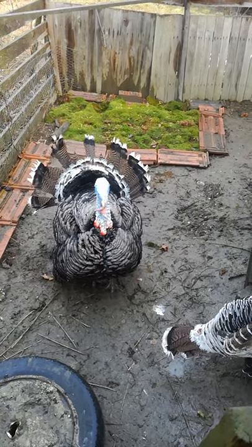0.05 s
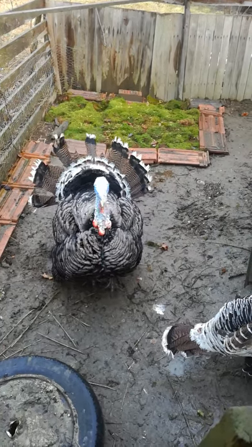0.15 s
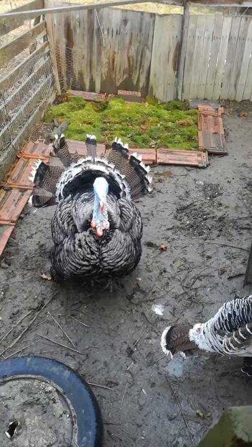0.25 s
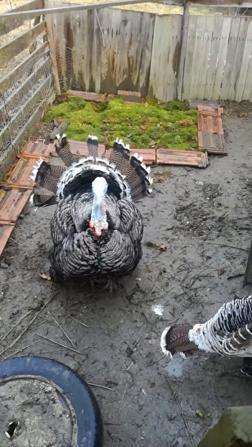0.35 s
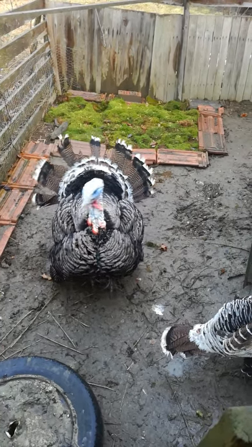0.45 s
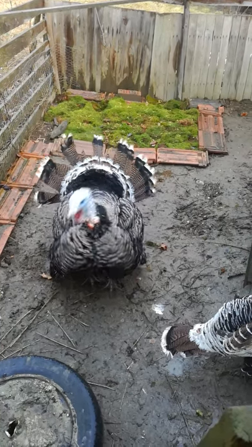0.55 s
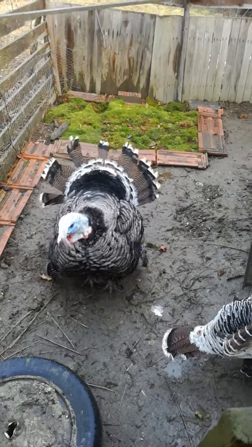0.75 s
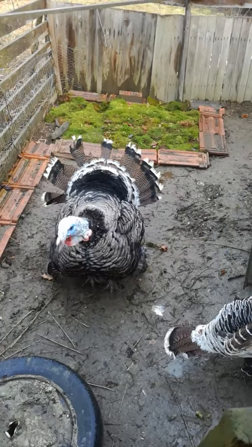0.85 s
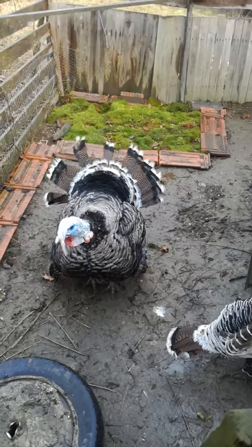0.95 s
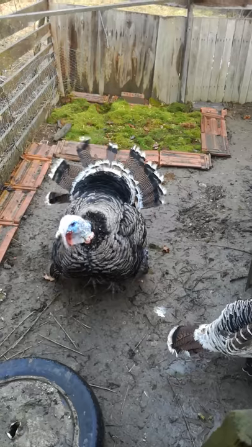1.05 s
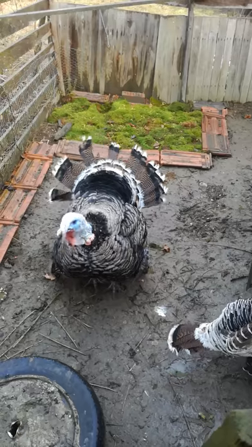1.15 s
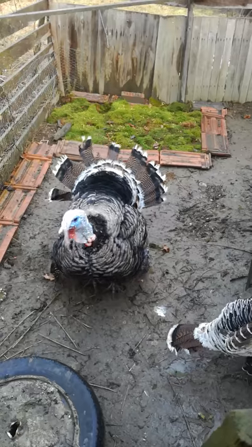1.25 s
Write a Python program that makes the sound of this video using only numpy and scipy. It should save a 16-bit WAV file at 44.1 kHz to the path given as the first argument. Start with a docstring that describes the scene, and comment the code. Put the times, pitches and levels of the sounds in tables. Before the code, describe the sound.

Loud, raspy turkey gobble tumbling between low and high notes, just after a short hoarse bird yelp

```python
"""A faint low hum and outdoor rumble, made of a wavering sine and coloured noise, lie under the whole scene.
Another bird's yelp comes first, hoarse and then clear: harmonics and rasp follow one drawn pitch and level line.
It sets off a turkey tom in a small, wood-fenced farm pen. His gobble is a run of quick raspy notes flipping
between a low and a high register, weaker towards the end, with soft deep thumps under the first and last notes.
Both birds pass through brief echoes of ground and fences, ringing resonances and short and long noise tails."""
import sys
import numpy as np
from scipy import signal
from scipy.fft import rfft, irfft, next_fast_len
from scipy.io import wavfile
from scipy.ndimage import uniform_filter1d, minimum_filter1d, map_coordinates

SR = 44100
rng = np.random.default_rng(int(sys.argv[2]) if len(sys.argv) > 2 else 0)


def file_out(sig):
    """Save sig as 16-bit WAV at sys.argv[1]."""
    # one column per channel
    cols = np.atleast_2d(sig).T
    # limit, then scale
    lim = np.clip(cols, -1, 1)
    pcm = np.round(lim * 32767).astype(np.int16)
    wavfile.write(sys.argv[1], SR, pcm)


N = 57330  # length in samples


def undb(db):
    """Turn decibels into an amplitude factor."""
    return 10 ** (np.asarray(db) / 20)


def unit(x):
    """Scale to rms 1."""
    return x / np.sqrt(np.mean(x ** 2) + 1e-18)


def colour(x, points, share=1, phase=((0, 0), (1, 0))):
    """Filter by a share of a (Hz, dB) curve and an optional (Hz, radians) curve."""
    n = x.shape[-1]
    size = next_fast_len(n + 2048)
    f = np.arange(size // 2 + 1) * SR / size
    hz, db = np.array(points).T
    gain = undb(share * np.interp(np.log(f + 1), np.log(hz), db))
    turn = np.exp(1j * np.interp(f, *np.array(phase).T))
    return irfft(rfft(x, size) * gain * turn, size)[..., :n]


def wander(n, rate):
    """Smooth random motion with a spread near 1, drawn from `rate` random points a second."""
    at = np.arange(n) / SR * rate
    return map_coordinates(rng.standard_normal(4096), [at], order=3, mode="wrap")


def swell(n):
    """Rise and fall of one note: a sine arch, narrowed by its exponent."""
    return np.sin(np.pi * (np.arange(n) + .5) / n) ** 1.44


def add(out, start, x):
    """Mix a sound in at its time in seconds."""
    i = int(start * SR)
    out[i:i + len(x)] += x[:N - i]


def air():
    """Quiet outdoor rumble, partly shared by both channels, with a faint wavering hum."""
    rumble_db, hum_hz, hum_db = -71, 80, -70.5
    # Colour of the rumble. Each row: frequency in Hz, level in dB.
    rumble_colour = [(25, -9), (40, 0), (55, -12.5), (82, -6), (110, -9), (170, -6.5), (300, -16),
                     (1000, -30), (3000, -40.5), (8000, -42), (15000, -42)]
    noise = rng.standard_normal((3, N))
    rumble = colour(noise[:2] + noise[2], rumble_colour)
    hum = np.sin(2 * np.pi * np.cumsum(hum_hz * (1 + 0.013 * wander(N, 15))) / SR)
    return undb(rumble_db) * unit(rumble) + undb(hum_db) * unit(hum)


def voice(hz, levels, flutter, blur, throat, rasp):
    """A fluttering syrinx: fundamental, octave, uneven upper harmonics, a puff of rasp each cycle, a hissing sheen."""
    flutter_hz, overtone_spread_db, puff_db, hiss_noise_db = 418, 4, 1.2, -3
    # Colour of the hissing sheen. Each row: frequency in Hz, level in dB.
    hiss = [(2000, -4), (4200, -13.5), (6000, 0), (8000, -5), (10000, -5), (12000, -17.5), (15000, -11)]
    n = len(hz)
    hz = hz * (1 + flutter * wander(n, flutter_hz))
    phase = 2 * np.pi * np.cumsum(hz) / SR
    upper = 0
    for k in np.arange(3, 25):
        below_nyquist = k * hz < SR / 2
        size = undb(overtone_spread_db * wander(n, 45)) * below_nyquist
        blurred = phase + blur * wander(n, 350)  # blur in radians, multiplied by the harmonic number
        upper = upper + size * np.cos(k * blurred + rng.uniform(0, 2 * np.pi))
    puffs = rng.standard_normal(n) * (1 + .5 * np.cos(phase))
    puffs = puffs * undb(puff_db * wander(n, 200))
    sheen = colour(unit(upper) + undb(hiss_noise_db) * unit(puffs), hiss)
    parts = [np.cos(phase), np.cos(2 * phase), colour(upper, throat), colour(puffs, rasp), sheen]
    # a list of four levels leaves the sheen out
    return sum(undb(db) * unit(part) for db, part in zip(levels, parts))


def yelp():
    """A hoarse start breaks upward into a clear held note, as pitch and levels glide from point to point."""
    # Course of the yelp. Each row: time in seconds, pitch in Hz, then the levels, before the pen, of the
    # fundamental, octave, upper harmonics and rasp in dB.
    course = [(0, 923, -63, -53.5, -64.5, -56.5), (0.038, 945.4, -81, -67, -69, -72.5),
              (0.088, 906.2, -77, -69, -77, -65), (.102, 766.4, -61.5, -63, -59.5, -44),
              (0.126, 746, -56, -52, -48.5, -41), (.168, 759, -44.5, -37.5, -44, -45.5),
              (.174, 939.5, -53.5, -46, -44, -34), (.195, 951, -45.5, -38.5, -43, -48),
              (.218, 951.5, -53.5, -23.5, -38, -53.5), (.255, 962, -44.5, -23.5, -38.5, -51.5),
              (0.283, 959, -42.5, -22.5, -37, -61.5), (0.302, 931, -48.5, -33, -49.5, -62.5),
              (0.316, 922.6, -49.5, -27, -34, -46), (.323, 891.5, -52.5, -44.5, -48, -41.5),
              (0.326, 782, -41.5, -53, -57, -42), (.345, 747, -52.5, -55, -56.5, -43),
              (.36, 733, -53.5, -44.5, -65.5, -58), (.39, 710, -92, -93.5, -94, -96.5)]
    # Colour of the upper harmonics. Each row: frequency in Hz, level in dB.
    throat = [(2200, 10), (2900, 1), (3800, 1.5), (4700, -20.5), (5400, -23.5), (6700, -7.5), (7700, -6),
              (10000, -30.5), (14500, -28.5)]
    # Colour of the rasp. Each row: frequency in Hz, level in dB.
    rasp = [(300, -40.5), (550, -51.5), (750, -1.5), (1150, -16.5), (1800, 8), (3000, -6), (4600, -11),
            (5400, -38), (7600, -20), (10000, -35.5), (15000, -50.5)]
    t = np.arange(N) / SR
    times, *columns = np.array(course).T
    hz, *levels = (np.interp(t, times, column) for column in columns)
    sounding = t < times[-1]
    return voice(hz, levels, flutter=.002, blur=.02, throat=throat, rasp=rasp) * sounding


def gobble():
    """Overlapping notes, each a short curve of pitch in one of two registers; they dull as the gobble runs out."""
    shimmer_db, dullest_s = 2.21, 1.08
    # Notes of the gobble. Each row: start in seconds, length in seconds, first, middle and last pitch in Hz,
    # then the levels, before dulling, swell and pen, of the fundamental, octave, upper harmonics, rasp and hiss in dB.
    notes = [ (.353, 0.016, 557, 622.5, 676, -31, -23.5, -32, -35, -49),
             (0.361, 0.032, 643.6, 692.4, 661.7, -18.5, -6.5, -9.5, -22, -30.5),
             (0.389, 0.022, 636, 578, 565, -41.5, -15.5, -19, -34, -51.5),
             (.411, 0.022, 611, 691, 725, -18, -4, -30, -33, -53),
             (0.415, 0.027, 750, 787.6, 700, -12, -29, -37.5, -23.5, -38),
             (0.426, 0.053, 1106, 1102, 1047, -15.5, -31.5, -33, -37.5, -30),
             (0.46, 0.05, 704, 634, 560, -37, -54, -44, -35, -58),
             (0.505, .050, 1097, 1038, 1017, -25.5, -35.5, -30, -34.5, -37.5),
             (.534, 0.026, 746, 718, 686, -32.5, -33.5, -35.5, -41.5, -47),
             (0.572, 0.047, 1105, 1048, 993, -15.5, -23.5, -32, -29, -38.5),
             (0.59, 0.084, 730.6, 739.6, 780.4, -24.5, -31.5, -29, -41.5, -48.5),
             (0.637, 0.059, 752.7, 781.8, 604, -22, -34, -19.5, -29.5, -40),
             (.693, 0.044, 1077, 1068, 1008, -12.5, -42.5, -26.5, -34, -43.5),
             (0.725, 0.024, 734, 655, 663, -34.5, -34, -36, -32.5, -67),
             (0.741, 0.034, 1016, 986.5, 1002, -48, -31.5, -33, -42, -69),
             (0.749, 0.067, 1044, 1039, 1010, -12.5, -42.5, -38, -27.5, -42),
             (0.8, .036, 766, 735.2, 645, -23.5, -38.5, -30.5, -31.5, -45),
             (0.837, .052, 578, 671, 668.6, -24.5, -29.5, -37.5, -37.5, -57),
             (0.869, 0.036, 860.4, 852.4, 820, -43, -24.5, -36, -28, -80),
             (0.897, 0.023, 1034, 982, 941, -16.5, -44, -42, -31, -64.5),
             (0.902, 0.02, 875.5, 853, 855, -38.5, -32, -51, -33.5, -71.5),
             (.906, 0.028, 676, 557, 489, -36, -40, -77, -40, -112),
             (0.965, .020, 974, 925, 924, -30.5, -57, -63.5, -52, -70.5),
             (0.973, .046, 605.7, 673.8, 640.7, -32.5, -31, -39.5, -38.5, -54),
             (1.001, 0.036, 633, 588, 472, -35.5, -44.5, -65, -44, -86),
             (1.037, .026, 1063, 847, 800, -53, -42, -53, -51, -75.5),
             (1.052, .020, 952, 933, 903, -21.5, -46, -46, -37, -82),
             (1.061, 0.031, 937, 880, 918, -33, -75, -60, -38.5, -86)]
    # Throat and beak: colour of the upper harmonics. Each row: frequency in Hz, level in dB.
    throat = [(1600, 27.5), (2100, 10.5), (2900, 5), (3650, -8.5), (4200, 4), (4600, -12.5), (5400, -2.5),
              (7500, -37.5), (10000, -26), (15000, -47.5)]
    # Colour of the rasp. Each row: frequency in Hz, level in dB.
    rasp = [(100, -46), (300, -27), (410, -29), (510, -3), (1100, -2), (1900, -1), (2500, -11), (3400, -12),
            (4500, -21), (6000, -25), (9000, -36), (15000, -50)]
    # Dulling that would be complete at dullest_s. Each row: frequency in Hz, level change in dB.
    dulling = [(3500, 0.5), (7000, -3), (12000, -13)]
    out = np.zeros(N)
    first_start = notes[0][0]
    for start, length, first, middle, last, *levels in notes:
        n = int(length * SR)
        arch = np.polyfit([0, .5, 1], [first, middle, last], 2)
        hz = np.polyval(arch, np.linspace(0, 1, n))
        note = voice(hz, levels, flutter=.007, blur=.03, throat=throat, rasp=rasp)
        spent = ((start - first_start) / (dullest_s - first_start)) ** 2
        note = colour(note, dulling, spent)
        add(out, start, note * swell(n) * undb(shimmer_db * wander(n, 250)))
    return out


def thumps():
    """A few soft, deep sine cycles under the first and last notes."""
    thump_hz = 67.7
    # Thumps. Each row: start in seconds, length in seconds, level before the swell in dB.
    hits = [(0.359, 0.086, -44), (0.975, 0.068, -52.5)]
    out = np.zeros(N)
    for start, length, db in hits:
        n = int(length * SR)
        tone = np.sin(2 * np.pi * thump_hz * np.arange(n) / SR)
        add(out, start, undb(db) * swell(n) * unit(tone))
    return out


def place(x, balance, phase):
    """Direct sound, echoes, resonances and noise tails in one response, then a stereo tilt by frequency."""
    pen_t60_s, pen_db, far_t60_s, far_db = 0.12, -8.5, 1.0, -45  # far level before its colour
    # Colour of the long, far tail. Each row: frequency in Hz, level in dB.
    far_colour = [(200, -3), (1000, -3), (2000, 6.5), (5000, -9.5), (12000, -30)]
    # Echoes from ground and fences. Each row: left delay in seconds, right delay in seconds, level in dB.
    echoes = [(.0031, 0.0056, -13), (.0092, 0.0058, -17), (0.0192, .0168, -26)]
    # Narrow resonances that ring on after each note. Each row: frequency in Hz, time to fall 60 dB in
    # seconds, gain at the resonance in dB.
    rings = [(497, 0.069, 2), (1736, .16, -11), (2620, 0.29, -13), (3400, .10, 0), (3805, 0.093, 11),
             (4860, 0.037, 6), (5220, .13, -1.5), (6000, .10, -8)]
    t = np.arange(N) / SR

    def tail(t60):
        """Decaying noise from 3 ms on, with about the energy of the direct sound."""
        noise = rng.standard_normal((2, N)) * undb(-60 * t / t60) * (t > .003)
        return unit(noise) / np.sqrt(N)

    response = undb(pen_db) * tail(pen_t60_s)
    response += undb(far_db) * colour(tail(far_t60_s), far_colour)
    response[:, 0] += 1  # direct sound
    for left_s, right_s, db in echoes:
        response[[0, 1], [int(left_s * SR), int(right_s * SR)]] += undb(db)
    for hz, t60, db in rings:
        decay = np.log(1000) / t60
        ringing = np.exp(-decay * t) * np.cos(2 * np.pi * hz * t)
        response += undb(db) * 2 * decay / SR * ringing
    left, right = signal.fftconvolve(x[None], response, axes=1)[:, :N]
    # the left takes a share of the balance curve and the phase turn, the right an opposite share
    return np.array([colour(left, balance, 0.79, phase), colour(right, balance, -.5)])


def scene():
    """Set the yelp and the gobble in the pen, over thumps and air that bypass it."""
    # Stereo tilt, applied in part to each side. Each row: frequency in Hz, left against right in dB.
    yelp_balance = [(700, 9.5), (1900, -2.5), (4400, -5.5), (8000, -1), (15000, 5.5)]
    tom_balance = [(200, -0.5), (450, 3.5), (700, -14.5), (880, -9.5), (1030, -1.5), (1350, -3.5),
                   (2100, -0.5), (2600, -12), (3350, -2), (4400, -9.5), (8100, -5.5), (15000, -0.5)]
    # Phase turn of the left channel. Each row: frequency in Hz, phase in radians.
    yelp_phase = [(0, 0), (15000, -9.5)]
    tom_phase = [(0, -1.5), (200, 0.7), (400, -2.5), (750, -3), (1000, -5), (2000, -7.5), (2550, -12.5),
                 (3200, -12), (4200, -17), (15000, -61.5)]
    other_bird = place(yelp(), yelp_balance, yelp_phase)
    tom = place(gobble(), tom_balance, tom_phase) * undb(-4.0)
    return air() + other_bird + tom + thumps()


def record(dry):
    """A fast limiter holds down the loudest peaks, and a steep low-pass cuts the top."""
    ceiling, limiter_s, top_hz = 1, .004, 15650
    size = int(limiter_s * SR)
    needed = ceiling / np.maximum(abs(dry), ceiling)
    gain = uniform_filter1d(minimum_filter1d(needed, size), size)
    low_pass = signal.ellip(8, .2, 70, top_hz, fs=SR, output="sos")  # order, ripple dB, stop-band dB
    return signal.sosfilt(low_pass, dry * gain)


dry = scene()
out = record(dry)
file_out(out)
```